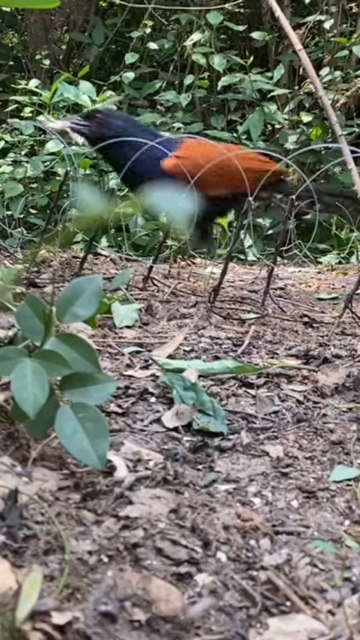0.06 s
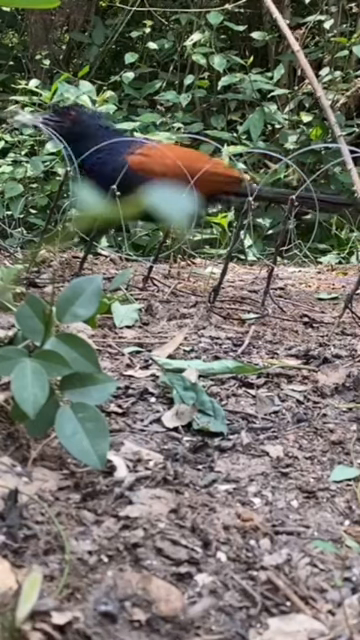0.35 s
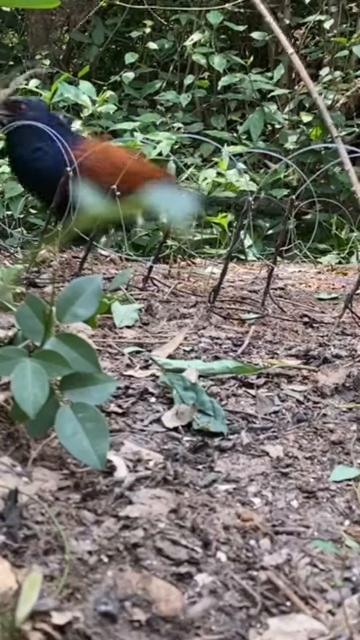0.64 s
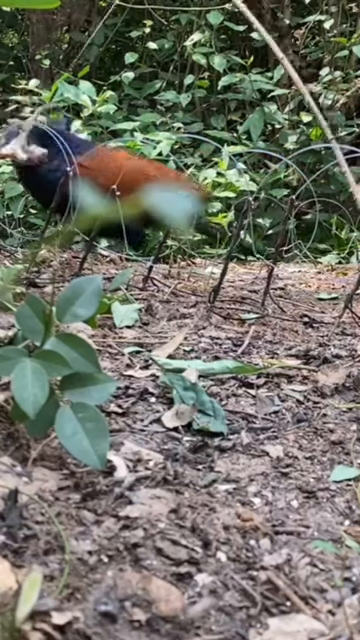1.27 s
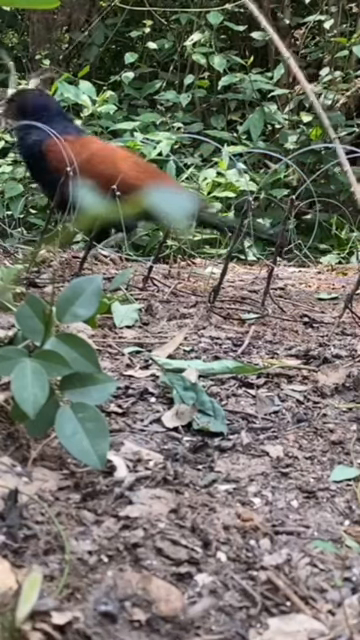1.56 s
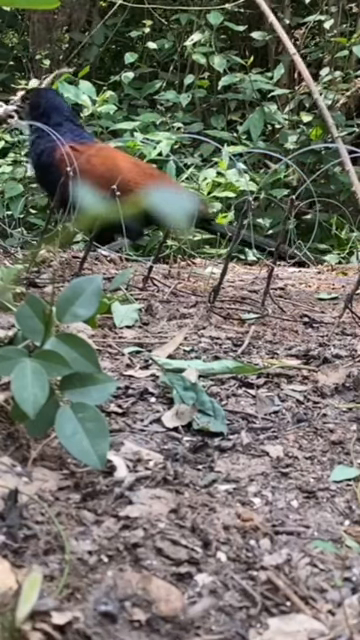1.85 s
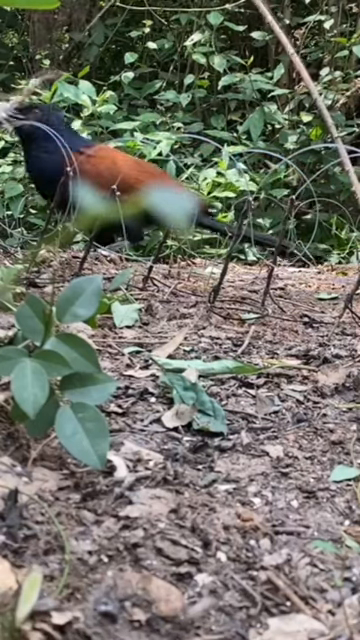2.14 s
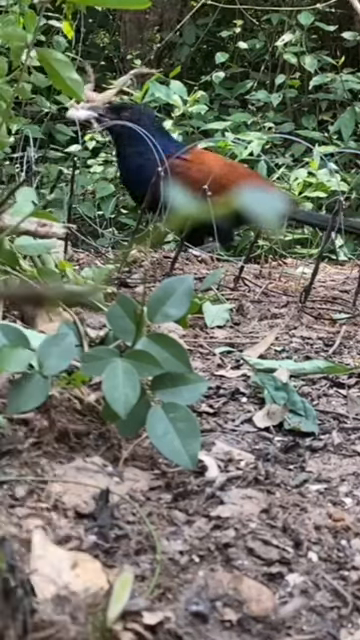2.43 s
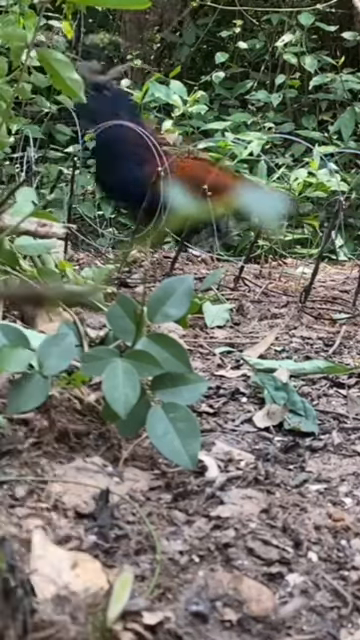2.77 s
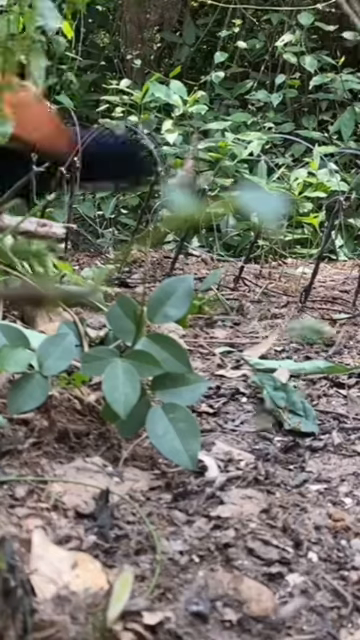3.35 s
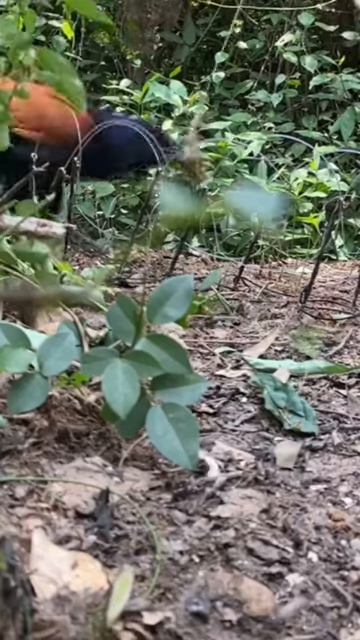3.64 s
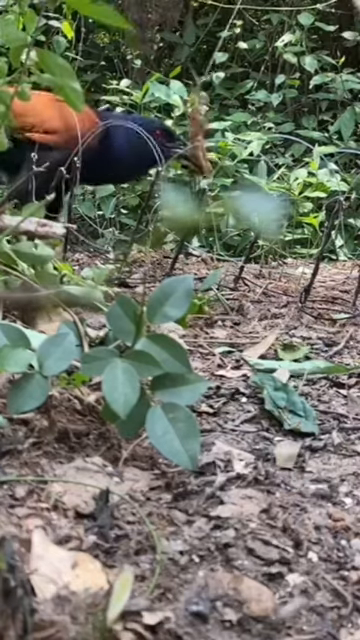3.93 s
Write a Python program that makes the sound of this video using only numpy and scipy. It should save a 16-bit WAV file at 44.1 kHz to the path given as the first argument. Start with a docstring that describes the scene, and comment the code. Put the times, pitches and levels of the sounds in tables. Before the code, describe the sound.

Four low hoots from a nearby bird follow its wing flaps and leafy rustling.

```python
"""A slow single-cylinder engine chugs far off and small birds twitter in a quiet wood.
Close to the microphones a coucal shuffles on dry litter, then flaps off through the foliage:
its wings push puffs of air, leaves crackle and twigs snap. Four deep, soft hoots follow from
its swollen throat, with dull thuds as it comes down. Trunks and undergrowth scatter echoes."""
import sys
import numpy as np
from scipy import signal
from scipy.fft import rfft, irfft
from scipy.io import wavfile
from scipy.ndimage import uniform_filter1d

SR = 44100
rng = np.random.default_rng(int(sys.argv[2]) if len(sys.argv) > 2 else 0)


def wrap_up_sound(samples):
    """Save the sound to the file named by the first command line argument, as 16-bit audio."""
    columns = np.atleast_2d(samples).T
    # keep every value between -1 and 1, then stretch to whole-number steps
    tamed = np.clip(columns, -1, 1)
    steps = np.round(tamed * 32767).astype(np.int16)
    wavfile.write(sys.argv[1], SR, steps)


N = 176400
T = np.arange(N) / SR
HZ = np.fft.rfftfreq(N, 1 / SR)


def amp(db):
    """Decibels to gain."""
    return 10 ** (np.asarray(db) / 20)


def unit(x):
    """Scales to rms 1."""
    return x / np.sqrt(np.mean(x ** 2) + 1e-20)


def read(points, hz):
    """Reads a table on a log-frequency axis."""
    f, value = np.transpose(points)
    return np.interp(np.log(hz + 1), np.log(f + 1), value)


def add(mix, s, sound):
    """Mixes a stereo sound in at time s."""
    part = mix[:, max(round(s * SR), 0):][:, :sound.shape[1]]
    part += sound[:, :part.shape[1]]


def pan(db):
    """Gains that make the left microphone db louder than the right."""
    return amp(np.array([np.atleast_1d(db), -np.atleast_1d(db)]) / 2)


def alike(pair, same):
    """Makes two unrelated channels partly alike."""
    same = np.clip(same, -1, 1)
    return np.array([pair[0], same * pair[0] + np.sqrt(1 - same ** 2) * pair[1]])


def colour(x, points):
    """Filters by a spectrum table, keeping the power of white noise."""
    return irfft(rfft(x) * unit(amp(read(points, HZ))), N)


def strikes(events, rise_s, fall_s):
    """Envelope that swells to a peak and dies away at each (t/s, level/dB) event."""
    return sum(amp(db) * np.exp(-(np.minimum(T - s, 0) / rise_s) ** 2 - np.clip((T - s) / fall_s, 0, 50))
               for s, db in events)


def fuzzy(hz, width_hz, size):
    """Complex noise in a resonance that may move, two unrelated channels."""
    z = rng.standard_normal((2, size)) + 1j * rng.standard_normal((2, size))
    z = signal.sosfilt(signal.butter(4, width_hz / 2, fs=SR, output="sos"), z)
    return z * np.exp(2j * np.pi * np.cumsum(hz * np.ones(size)) / SR)


def waver(length, size):
    """A random wobble of rms about 1, smoothed over size samples."""
    return unit(uniform_filter1d(uniform_filter1d(rng.standard_normal(SR), size), size))[:length]


def air(level_db=-56.5, patch_db=1.2):
    """All around: low outdoor rumble and faint hiss, drifting in patches."""
    spectrum = [(12, -54.5), (25, -39), (38, -23.5), (55, 2), (90, 1), (130, -8.5), (192, -16.5),
                (283, -20), (456, -27), (900, -29.5), (1150, -35.5), (1600, -35), (2500, -39.5),
                (4370, -42), (7020, -50), (8300, -67), (10100, -51.5), (11600, -72.5), (15800, -76)]  # open air: f/Hz, level/dB
    likeness = [(60, 0.97), (130, 1), (290, 0.59), (640, -0.11), (1410, -0.37), (3100, 0.76), (6820, 0.53),
                (15000, 0.6)]  # between the microphones: f/Hz, correlation
    balance = [(60, 0), (110, -4), (200, -3), (380, 1.5), (700, 1.5), (1290, 0), (2380, 1), (4400, 3),
               (8120, -2), (15000, -3)]  # lean of the air: f/Hz, left-right/dB
    frames, hz = N // 512 + 5, np.fft.rfftfreq(2048, 1 / SR)
    a, b, c, d, patches = rng.standard_normal((5, frames, len(hz)))
    patches = unit(uniform_filter1d(uniform_filter1d(patches, size=10, axis=0), size=30, axis=1))
    bands = alike([a + 1j * b, c + 1j * d], read(likeness, hz))
    bands = bands * amp(read(spectrum, hz) + patch_db * patches) * pan(read(balance, hz))[:, None]
    _, noise = signal.istft(bands.transpose(0, 2, 1), nperseg=2048, noverlap=1536)
    return amp(level_db) * unit(noise[:, :N])


def wood(x, t60_s=0.72, build_s=0.011, echoes_per_s=2000):
    """Scattered echoes come back from trunks and undergrowth."""
    t = T[:SR]
    taps = rng.standard_normal((2, SR)) * (rng.random((2, SR)) < echoes_per_s / SR)
    tail = alike(taps, 0.49) * amp(-60 * t / t60_s) * np.minimum(t / build_s, 1) ** 2
    return signal.fftconvolve(x, tail / np.linalg.norm(tail[0]), axes=1)[:, :N]


def engine(cycle_s=.1365, vary_db=2.24):
    """Far off, a slow engine makes the same three dull beats in every cycle."""
    # clatter, exhaust thump and knock: delay/s, level/dB, f/Hz, width/Hz, rise/s, fall/s
    strokes = [(.092, -65, 310, 130.6, 0.0059, 0.019), (0.111, -51.5, 71.85, 30.04, 0.01, .015),
               (0.1322, -57.5, 274.5, 112, 0.0042, 0.012)]
    out = np.zeros((2, N))
    for delay, db, hz, width_hz, rise, fall in strokes:
        times = np.arange(delay - cycle_s, T[-1] + cycle_s, cycle_s)
        beats = strikes(zip(times, vary_db * rng.standard_normal(40)), rise, fall)
        band = alike(fuzzy(hz, width_hz, N), np.interp(hz, [70, 300], [.995, .85]))
        evened = band.real / np.sqrt(abs(band) ** 2 + .5 * np.mean(abs(band) ** 2))
        out += amp(db) * beats * unit(evened)
    return out * pan(-1.1)


def small_birds(chirp_s=0.036, wobble=0.03, wet_db=-0.5):
    """Deep in the wood: short, thin chirps blurred by the trees, and lower chatter."""
    twitters = [(.035, -77, 3480, 2987), (.08, -73, 3500, 4000), (.12, -73, 3523, -3000),
                (.162, -79, 3450, 3000), (.208, -78, 3400, 5997), (.247, -76, 3500, 3000),
                (.32, -75.5, 3170, 11995), (.35, -83, 3550, 8002), (.5, -78.5, 3600, 8997),
                (.828, -75, 3300, 3000), (.867, -75.5, 3467, 3000), (.903, -73.5, 3520, 2000),
                (.922, -77, 3540, -4000), (.95, -80, 3439, 6997), (3.455, -78, 3600, 12000),
                (3.5, -75.5, 3465, 12000)]  # far chirps: t/s, level/dB, f/Hz, glide/(Hz per s)
    calls = [(0.482, -84), (1.179, -84), (1.314, -78), (1.366, -85), (1.59, -79), (2.23, -78)]  # chatter of a farther bird: t/s, level/dB
    chirps = np.zeros((2, N))
    t = np.arange(0, chirp_s, 1 / SR) - chirp_s / 2
    for s, db, hz, glide in twitters:
        pitch = hz * (1 + wobble * waver(len(t), size=40)) + glide * t
        chirp = np.hanning(len(t)) * np.sin(2 * np.pi * np.cumsum(pitch) / SR)
        add(chirps, s - chirp_s / 2, pan(1.5) * amp(db) * chirp)
    echoes = amp(wet_db) * wood(chirps)
    chatter = unit(alike(fuzzy(hz=2500, width_hz=440, size=N), .6).real)
    return chirps + echoes + strikes(calls, rise_s=.018, fall_s=.044) * chatter


def steps(thud_hz=59, thud_s=0.028):
    """On the ground nearby, feet scuff the litter; heavier landings thud in the soil."""
    scuffs = [(1.032, -81), (1.208, -79), (1.581, -96), (1.679, -94), (2.218, -84), (3.389, -74.5),
              (3.56, -70), (3.61, -70), (3.82, -71.5), (3.99, -68.5)]  # soft footfalls: t/s, level/dB
    spectrum = [(200, -19.5), (700, -5.5), (1500, 4), (2400, -2), (3800, 2), (6000, -8.5), (8300, -25),
                (10000, -14), (12000, -41.5)]  # scuffed litter: f/Hz, level/dB
    landings = [(3.556, -34), (3.66, -40.5), (3.75, -47.5), (3.815, -46.5)]  # the bird comes down and steps: t/s, level/dB
    litter = colour(alike(rng.standard_normal((2, N)), .5), spectrum)
    thuds = sum(amp(db) * np.exp(-((T - s) / thud_s) ** 2) * np.sin(2 * np.pi * thud_hz * (T - s))
                for s, db in landings)
    return thuds + pan(3) * strikes(scuffs, rise_s=.018, fall_s=.02) * litter


def leaves(crackles_per_s=2200, spread_db=3, hiss=0.82, snap_s=0.00043, left_lead_s=.00002):
    """Close by, dry leaves crackle and hiss as the bird pushes through; twigs snap."""
    stir = [(0, -100), (.95, -93.5), (1.12, -81), (1.4, -95), (1.9, -91), (2.53, -91), (2.62, -74),
            (2.72, -67.5), (2.77, -50), (2.94, -52.5), (3.09, -52.5), (3.19, -61.5), (3.27, -62),
            (3.32, -70), (3.6, -75), (3.7, -87), (3.82, -78), (3.93, -87.5), (4, -63.5)]  # steady stirring of the leaves: t/s, level/dB
    brushes = [(2.764, -45), (2.81, -53.5), (2.868, -44), (2.902, -51), (2.926, -54.5), (2.981, -34),
               (3.002, -50), (3.068, -53), (3.091, -53.5), (3.128, -55.5)]  # feathers brushing through: t/s, level/dB
    breaks = [(1.124, -68), (1.921, -61), (2.7, -45.5), (2.761, -34), (2.839, -40), (2.8632, -24.5),
              (2.903, -42.5), (2.975, -29), (3.01, -39), (3.065, -41), (3.078, -41.5), (3.368, -48),
              (3.406, -60.5)]  # twigs and leaves snapping: t/s, level/dB
    spectrum = [(290, -24.5), (500, 1.5), (545, -4.5), (717, -10), (1030, -8.5), (1610, -17), (5580, -4.5),
                (7660, -5.5), (8350, -15), (9240, -1), (10200, 1.5), (11500, -11), (12300, -40),
                (14300, -17), (15800, -32)]  # dry foliage: f/Hz, level/dB
    balance = [(500, 1.5), (2400, 8.5), (4400, 1.5), (8000, 1.5), (15000, -2)]  # foliage at the microphones: f/Hz, left-right/dB
    size = amp(spread_db * np.minimum(rng.exponential(1, (2, N)), 5))
    crackle = size * rng.choice([-1, 1], (2, N)) * (rng.random((2, N)) < crackles_per_s / SR)
    grain = unit(alike(unit(crackle) + hiss * rng.standard_normal((2, N)), 0.6))
    push = amp(np.interp(T, *np.transpose(stir))) + strikes(brushes, rise_s=.0082, fall_s=.014)
    snaps = strikes(breaks, snap_s / 10, snap_s) * alike(rng.standard_normal((2, N)), .7)
    # the sound reaches the left microphone first
    microphones = pan(read(balance, HZ)) * np.exp(-2j * np.pi * np.outer([0, left_lead_s], HZ))
    return irfft(rfft(colour(push * grain + snaps, spectrum)) * microphones, N)


def wings():
    """Near wing beats push low puffs of air; two strokes swish downward in pitch."""
    puffs = [(2.766, -46), (2.811, -41.5), (2.891, -41), (2.925, -42), (2.98, -37), (3.024, -46.5),
             (3.072, -45)]  # wing beats: t/s, level/dB
    spectrum = [(40, -8), (80, 1.5), (200, 3), (380, -3), (600, -16.5), (1000, -25.5), (2000, -44),
                (5000, -79)]  # pushed air: f/Hz, level/dB
    # wing and feather swishes: t/s, length/s, level/dB, first f/Hz, last f/Hz, width/Hz,
    # left lead/rad, left-right correlation, left-right/dB
    swishes = [(2.967, .055, -35.5, 1501, 1151, 1150, 2.2, 0.53, 3.5),
               (3.106, .052, -41.5, 1188, 680, 558.4, .66, 0.79, 2),
               (3.111, .032, -49.5, 7090, 7240, 1200, 0.24, 0.44, 0.5)]
    beats = strikes(puffs, rise_s=.0093, fall_s=.025)
    out = beats * colour(alike(rng.standard_normal((2, N)), 0.99), spectrum)
    for start, length, db, first_hz, last_hz, width_hz, lead, same, side_db in swishes:
        progress = np.linspace(0, 1, round(length * SR))
        band = alike(fuzzy(first_hz + (last_hz - first_hz) * progress, width_hz, len(progress)), same)
        swish = unit((band * np.exp([[0], [-1j * lead]])).real)
        arch = np.sin(np.pi * progress ** 0.89) ** 2
        add(out, start, amp(db) * pan(side_db) * arch * swish)
    return out


def hoots(rise_s=0.047, fall_s=0.023, swell_db=2.5, husk_db=-41):
    """The near coucal's swollen throat gives almost pure notes; overtones and husk grow with effort."""
    notes = [(3.105, 0.051, 281, -22.5), (3.308, 0.06, 285.7, -19), (3.529, 0.067, 288, -18),
             (3.762, 0.072, 287.4, -17.5)]  # four hoots: t/s, length before release/s, f/Hz, level/dB
    # partials of the voice: level/dB, exponent of effort, left lead/rad, left-right/dB
    harmonics = [(3, 1.093, .26, 1), (-20.5, 2.1, 1, 3.5), (-34.5, 1.9, 0.5, 8.5)]
    trunks = [(0.0116, -26.5), (0.0226, -22)]  # echoes off nearby trunks: delay/s, level/dB
    jitter, shimmer = 0.011, 0.017  # unsteadiness of pitch and strength
    scoop_s, sag_s, sag_lead_s = .014, .047, .01  # pitch scoops up, then sags from just before release
    voice = np.zeros((2, N))
    for start, length, hz, db in notes:
        t = np.arange(0, length + .08, 1 / SR)
        attack = np.sin(np.pi / 2 * np.minimum(t / rise_s, 1)) ** 1.1
        release = np.exp(-(np.maximum(t - length, 0) / fall_s) ** 2)
        swell = amp(swell_db * (np.minimum(t / length, 1) - 1.64))
        effort = attack * release * swell * np.exp(shimmer * waver(len(t), size=300))
        scoop = .025 * np.exp(-t / scoop_s)
        sag = .061 * np.clip((t - length + sag_lead_s) / sag_s, 0, 1)
        pitch = hz * (1 - scoop - sag + jitter * waver(len(t), size=200))
        phase = 2 * np.pi * np.cumsum(pitch) / SR
        breath = fuzzy(hz=439.6, width_hz=250, size=len(t))[0].real
        husk = unit(breath * (1 + .5 * np.cos(phase)))
        add(voice, start, amp(db + husk_db) * pan(2) * effort * husk)
        for k, (part_db, growth, lead, side_db) in enumerate(harmonics, 1):
            partial = np.sin([k * phase, k * phase - lead])
            add(voice, start, amp(db + part_db) * pan(side_db) * effort ** growth * partial)
    heard = voice.copy()
    for delay, db in trunks:
        add(heard, delay, amp(db) * voice)
    return heard


def scene():
    """The near bird and its echoes over the distant background."""
    voice = hoots()
    rustle = wings() + leaves() + steps()
    echoes = wood(amp(-28) * voice + amp(-24.5) * rustle)
    return voice + rustle + echoes + engine() + small_birds() + air()


def record(dry, edge_hz=15600):
    """The recorder's band limit cuts the highest treble."""
    lowpass = signal.firwin(511, edge_hz, window=("kaiser", 9), fs=SR)
    return signal.oaconvolve(dry, lowpass[None], "same")


dry = scene()
out = record(dry)
wrap_up_sound(out)
```